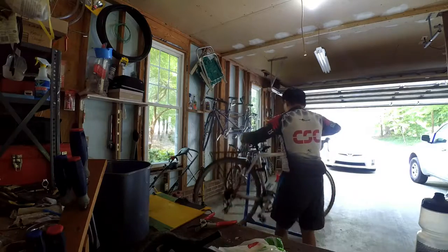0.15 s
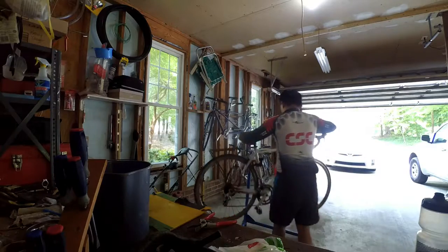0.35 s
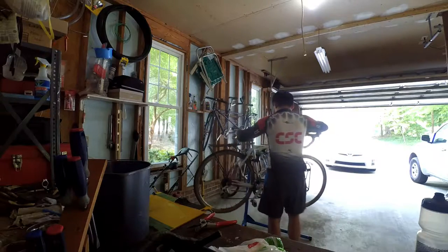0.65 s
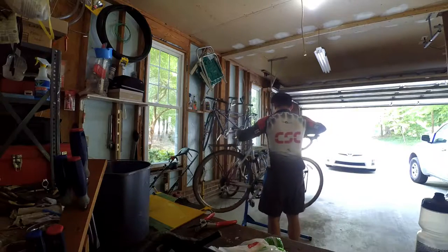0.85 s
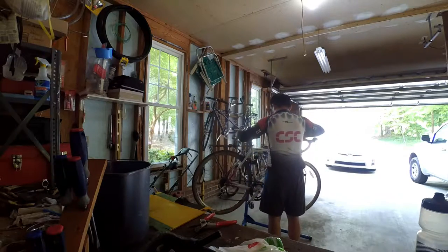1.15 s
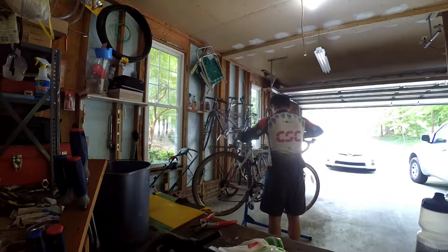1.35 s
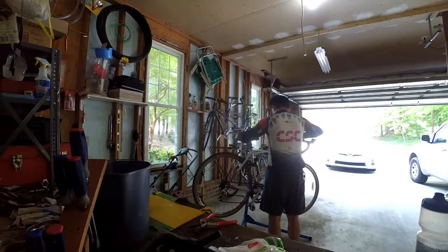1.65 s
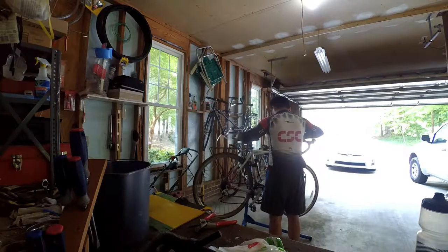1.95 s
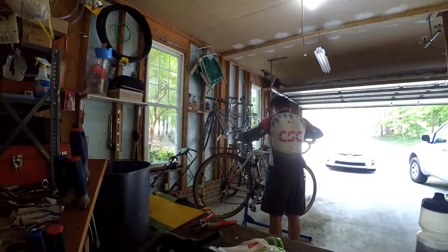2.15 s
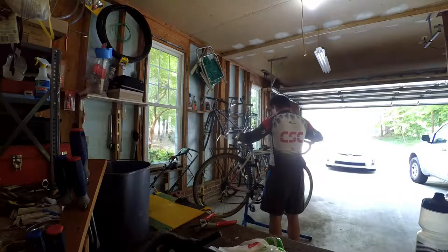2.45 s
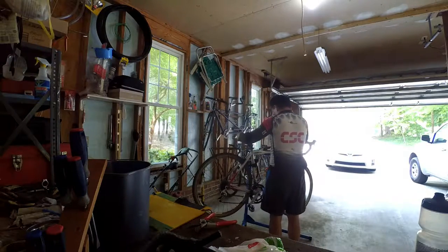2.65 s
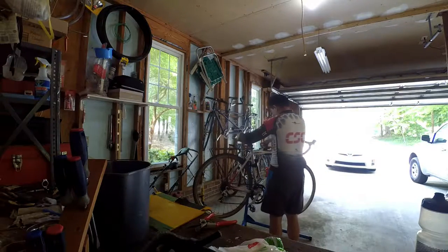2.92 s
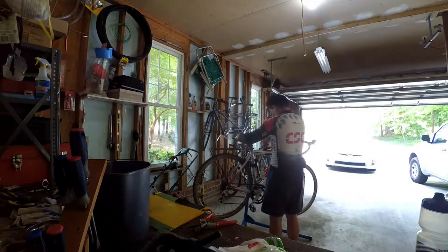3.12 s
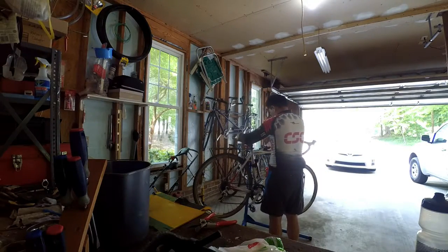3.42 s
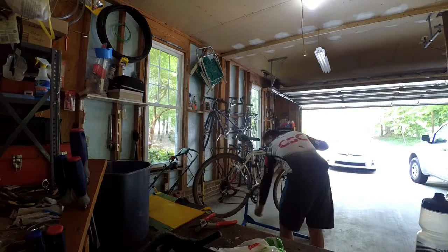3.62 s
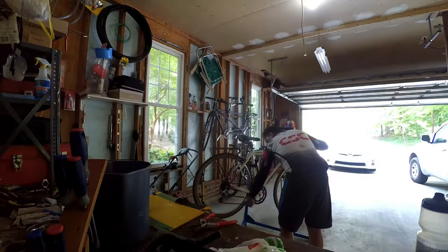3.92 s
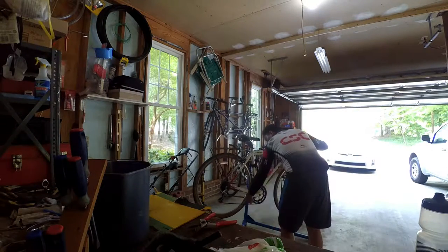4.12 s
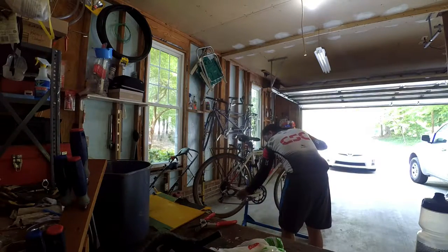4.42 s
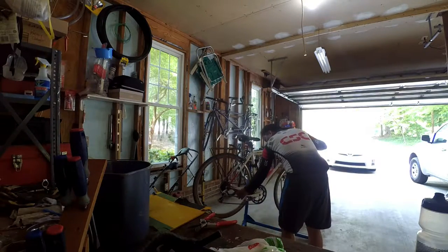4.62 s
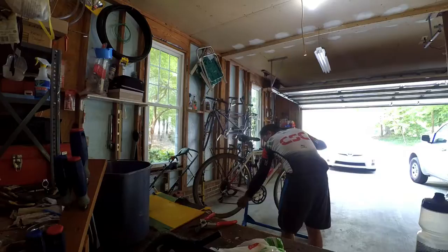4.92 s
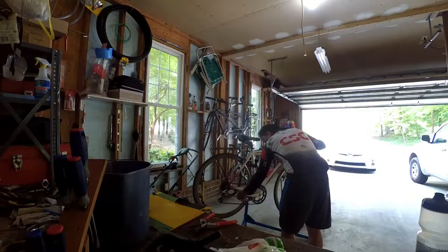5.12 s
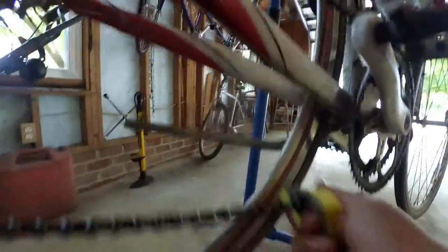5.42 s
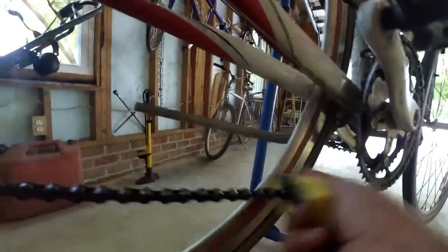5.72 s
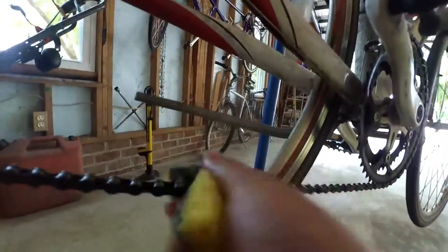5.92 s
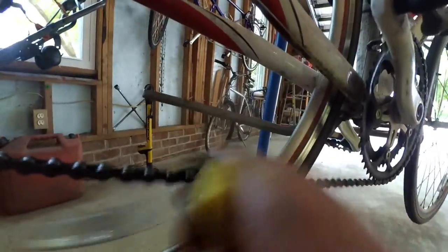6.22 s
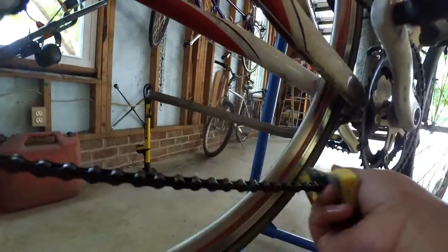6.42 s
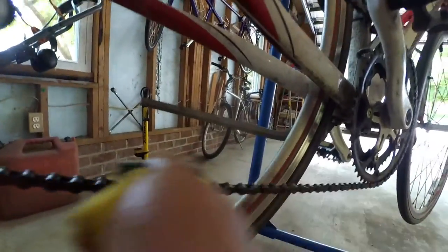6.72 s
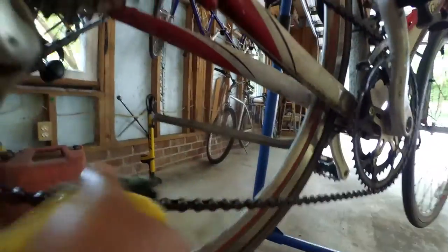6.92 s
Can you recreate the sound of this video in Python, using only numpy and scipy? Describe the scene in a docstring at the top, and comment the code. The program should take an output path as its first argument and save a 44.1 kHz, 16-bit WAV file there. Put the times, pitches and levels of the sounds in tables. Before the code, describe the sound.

An open garage with short reverberation, low wind rumble and faint hiss throughout. From 0 to 3.5 s, at a distance, shoes and clothes scuff softly while a bicycle is set in a repair stand: dull knocks, a loud bright metallic clank at about 0.85 s, lesser ringing clanks at 1.4, 2.1 and 3.0 s, a thud at 1.6 s. An insect buzzes faintly outside from 1 to 3 s; one tiny rising bird chirp comes at 3.4 s. After a cut at 3.5 s a faint low rush joins; from 3.85 s a few uneven clicks become a steady ratchet, about 26 ticks per second, slowing very slightly, over a faint chain whir. At 5.2 s the view jumps close: a low bump dies away, a sponge rubs the chain in gritty strokes with link flicks, and sharp, dry pawl snaps come about ten per second, turning weaker and irregular after 6.6 s until 7 s.

```python
"""In an open garage, over low wind rumble and faint hiss, shoes scuff and a bicycle is set into a repair stand.
The frame knocks and rings, an insect buzzes outside and a bird chirps once.
After a cut a low rush joins, the cranks are turned backwards and the freehub pawl ticks across the room.
At a second cut the lows jump and die away; a sponge rubs the chain and the pawl snaps close by.
Blows are short noise puffs through resonances and dying sines; friction, wind and insect are shaped noise."""
import sys
import numpy as np
from scipy import signal
from scipy.fft import rfft, irfft, next_fast_len
from scipy.io import wavfile
from scipy.ndimage import map_coordinates

SR = 44100
rng = np.random.default_rng(int(sys.argv[2]) if len(sys.argv) > 2 else 0)


def volts_from_db(level):
    """Convert decibel levels to linear amplitude ratios."""
    exponent = np.asarray(level, float) / 20
    return 10 ** exponent


def to_wav(s):
    """Save 16-bit WAV."""
    ch = np.atleast_2d(s).T  # columns
    pcm = np.round(np.clip(ch, -1, 1) * 32767)  # PCM
    wavfile.write(sys.argv[1], SR, pcm.astype(np.int16))


N = 311346  # samples

# where one shot replaces the other: cut_s
CUT_TIMES = [3.486, 5.205]

# wind rumble, relative spectrum: frequency_hz, density_db
RUMBLE_SPECTRUM = [(1, -2.5), (3, -2.5), (10, -4.5), (15, 1), (35, -6.5), (70, -20), (150, -24), (300, -38),
                   (600, -79.5)]
# faint hiss, relative spectrum: frequency_hz, density_db
HISS_SPECTRUM = [(120, -2), (250, -4.5), (500, -7), (1000, -13.5), (2000, -20.5), (4000, -20),
                 (8000, -26.5), (11000, -25), (15000, -30.5)]
# noise unlike at the two microphone ports, relative spectrum: frequency_hz, density_db
PORT_SPECTRUM = [(2, 9.5), (10, -0.5), (35, -12), (70, -5), (250, -24), (600, -38.5), (1200, -44.5),
                 (16000, -50)]
# decay of the garage: frequency_hz, t60_s
GARAGE_DECAY = [(500, 0.33), (4000, 0.48), (13000, 0.27)]

# strokes of shoes and clothes: loudest_s, rise_s, fall_s, level_db, treble_over_level_db
SCUFF_STROKES = [(0, .1, 0.11, -62, -2), (.33, 0.037, 0.16, -66.5, -8), (.48, 0.21, 0.084, -61.5, -6),
                 (.63, 0.007, 0.11, -56, 0.5), (.682, 0.048, 0.09, -55, -6), (2.22, 0.084, 0.11, -67.5, 2),
                 (3.49, .003, 0.47, -67.5, 0.5), (3.7, 0.39, 0.34, -73, 3.5)]
# dull part of the scuffs, relative spectrum: frequency_hz, density_db
SCUFF_DULL_SPECTRUM = [(300, -120), (800, -6.5), (1800, 0.5), (3500, 5), (6000, 0.5), (9000, -41)]
# bright part of the scuffs, relative spectrum: frequency_hz, density_db
SCUFF_BRIGHT_SPECTRUM = [(3500, -35), (5500, -6), (7500, -5.5), (11000, -15), (15000, -21), (16500, -33)]
STROKE_DB = 12  # a stroke swells and fades by this much in its rise and fall times

# dull knocks of tyre and frame: start_s, level_db, low_ring_hz, high_ring_hz, high_part_db
KNOCK_BLOWS = [(.106, -60.5, 530, 2000, -1), (.564, -59.5, 1175, 2500, -1), (1.562, -61.5, 1310, 2810, -7),
               (1.619, -52.5, 520, 3226, 2.5), (2.162, -70, 2000, 2300, -1), (2.222, -71, 936, 2090, 7.5),
               (2.558, -64.5, 1240, 2580, -0.5), (2.565, -66, 634, 1750, -9), (2.815, -66, 3026, 3400, 4),
               (2.849, -63, 1157, 3450, -13), (3.213, -69, 1326, 6440, -4), (3.437, -71, 2764, 2870, -4),
               (3.573, -65, 577, 1960, 0)]
# metal on metal at the stand: start_s, level_db, dull_part_db, clamp_ring_db, tube_ring_db
CLANK_BLOWS = [(.837, -46, -20, -27, -11), (.8465, -29.5, -27.5, -15.5, -40), (.8664, -45, -13.5, -5, -22),
               (1.4192, -41, -29, -25, -14.5), (1.4405, -56, -13, -35, -10), (2.082, -53.5, -54, -18, -15),
               (3.007, -52.5, -20, -25, -29)]
# ringing modes of the stand's clamp: pitch_hz, level_db, t60_s
CLAMP_MODES = [(1166, -14, .3), (2152, -14, .3), (2283, -16, .3), (4620, -13, .25), (4790, -11, .3),
               (4935, 0, .24), (5018, -3, .2), (5490, -13, .25), (6872, -2, .3), (7580, -6, .15),
               (7980, -7, .3), (8450, -10, .2), (8870, -17, .3), (11250, -19, .25), (12350, -17, .25)]
# ringing modes of the bicycle tubes: pitch_hz, level_db, t60_s
TUBE_MODES = [(2590, -8, .3), (3795, -9, .3), (4735, -7, .3), (5010, -5, .3), (5135, 0, .25),
              (5570, -4, .2), (5766, -5, .25), (6470, -7, .25), (7880, -6, .25), (8910, -12, .2)]
# first contact of the blows: centre_hz, width_hz, level_db
CRACK_PEAKS = [(2500, 1500, 4), (5000, 700, 9), (7700, 1200, 7), (12700, 4300, -10)]
RING_BLUR_HZ = 6  # random phase drift roughens every ring by about this width

# insect outside, swelling and fading: time_s, level_db
BUZZ_LEVEL = [(.9, -83), (1.1, -74.5), (1.6, -71), (2.2, -71.5), (2.75, -72.5), (2.95, -81), (3.0, -90)]
# insect, relative spectrum: frequency_hz, density_db
INSECT_SPECTRUM = [(3000, -30), (4300, -6), (5200, 0), (6300, -3), (8000, -30)]
# the bird's one chirp: time_s, pitch_hz, level_db
CHIRP_PATH = [(3.383, 5470, -70), (3.39, 6060, -58.5), (3.398, 7280, -55.5), (3.404, 7500, -66),
              (3.41, 7400, -80)]
# low rush after the first cut, relative spectrum: frequency_hz, density_db
MURMUR_SPECTRUM = [(120, -29), (250, -2), (400, -1), (700, -6), (1300, -31)]
MURMUR_DB = -75

# cranks being pushed into motion, pawl heard across the garage: start_s, level_db
STARTING_TICKS = [(3.8516, -48), (3.9494, -52), (4.0037, -48)]
# then the even ticks: the first one, the gap, and what each tick adds to the gap
STEADY_S, GAP_S, GAP_GROWS_S = 4.0475, .03842, .000042
# the even ticks, one by one: level_db
STEADY_TICK_LEVELS = [-52, -48, -50, -51, -46, -50, -50, -46, -45, -49, -44, -47, -46, -53, -49, -46, -48,
                      -45, -43.5, -43.5, -45.5, -46, -43, -43, -51, -43, -48, -49, -53, -49]
TICK_COLOUR_DB = 2.5  # random spread of resonance levels from tick to tick
# hub heard from afar: centre_hz, width_hz, level_db
FAR_HUB_PEAKS = [(4200, 1200, -13), (7000, 700, 0), (8100, 500, -3), (9300, 600, 2), (11200, 400, -7),
                 (13000, 800, -1)]
# thin rings of the spokes: centre_hz, width_hz, level_db
SPOKE_PEAKS = [(8870, 35, 0), (11200, 25, -1), (13550, 40, -1)]
# chain running, heard from afar: time_s, level_db
CHAIN_LEVEL = [(3.9, -81), (4.05, -69), (5.205, -67)]

# low jump at the second cut, relative spectrum: frequency_hz, density_db
LOW_JUMP_SPECTRUM = [(1, -10.5), (5, 2.5), (12, -8.5), (30, -19.5), (100, -65.5)]
LOW_JUMP_DB, LOW_JUMP_FADES_DB_PER_S, LOW_JUMP_RISE_S = -37, 20.5, .001

# strokes of the sponge on the chain: loudest_s, rise_s, fall_s, level_db, treble_over_level_db
SPONGE_STROKES = [(5.21, .003, 0.51, -62, 0), (5.48, 0.059, 0.089, -55.5, 1), (5.61, 0.065, 0.11, -59, -1),
                  (5.69, 0.1, 0.027, -63.5, 8.5), (5.78, 0.052, 0.3, -58.5, 0.5),
                  (5.94, 0.14, 0.097, -63, 0.5), (6.14, 0.072, 0.12, -58, -1.5),
                  (6.245, 0.022, 0.15, -57, -0.5), (6.5, 0.083, .3, -56, -1.5),
                  (6.77, 0.28, 0.077, -64.5, 2), (6.95, .1, 1, -60.5, -0.5)]
# dull part of the rubbing, relative spectrum: frequency_hz, density_db
RUB_DULL_SPECTRUM = [(250, -15.5), (700, -8.5), (1900, -4.5), (3200, -8.5), (5000, -12.5), (8000, -47)]
# bright part of the rubbing, relative spectrum: frequency_hz, density_db
RUB_BRIGHT_SPECTRUM = [(2500, -28), (4500, -7), (7800, -5.5), (10500, -14.5), (14000, -23), (16500, -27)]
# links flick free of the sponge at random; least level over the stroke, and the range above it
LINKS_PER_S, LINK_DB, LINK_SCATTER_DB = 16, 15, 7

# pawl heard close by: start_s, level_db, low_part_db, high_part_db, tooth_ring_hz
NEAR_SNAPS = [(5.265, -25.5, -24, -5.5, 8450), (5.3584, -26.5, -18.5, -7.5, 8700),
              (5.458, -30.5, -14.5, -2, 7750), (5.5648, -26.5, -18, -8, 8110),
              (5.649, -23.5, -23.5, -11.5, 7980), (5.734, -27.5, -24, -6.5, 7900),
              (5.858, -33.5, -17, -1.5, 7170), (5.9566, -27.5, -29, -2.5, 8000),
              (6.052, -30, -16.5, -5.5, 8700), (6.1574, -26.5, -23.5, -2, 8000),
              (6.2554, -29, -19.5, -0.5, 7120), (6.346, -26, -22.5, -2, 6800),
              (6.4534, -26, -22.5, -3.5, 8380), (6.604, -30.5, -25, -3.5, 9300),
              (6.6783, -42.5, -16.5, -29, 5430), (6.7314, -41, -21.5, -25, 6300),
              (6.7394, -45.5, -15, -17, 6800), (6.8565, -46, -17, -14, 7500),
              (6.8866, -30, -15.5, -3.5, 8700), (6.9803, -30, -21, 1, 5840)]
# rim and frame: centre_hz, width_hz, level_db
RIM_FRAME_PEAKS = [(2000, 1400, -7), (3150, 260, 0.5), (4280, 980, -3)]
# hub shell: centre_hz, width_hz, level_db
SHELL_PEAKS = [(6660, 5600, -9.5), (9180, 1700, -6.5)]
# pawl: centre_hz, width_hz, level_db
PAWL_PEAKS = [(10600, 3400, -3), (13720, 1750, -0.5)]
# low rings of the rim, heard close by: centre_hz, width_hz, level_db
RIM_PEAKS = [(3300, 60, 0), (4400, 90, -3)]

# steep cut of the very top, above about 15 kHz: frequency_hz, gain_db
TOP_CUT = [(14000, -1.5), (15100, -2.5), (15500, -20), (16500, -19)]
# constant offset of each channel, left then right: offset in full scale
CHANNEL_OFFSETS = [
    [.0031],
    [-.00536],
]


def unit(x):
    """x at rms 1."""
    return x / np.sqrt(np.mean(x ** 2) + 1e-20)


def along(points, hz):
    """Reads (Hz, value) points on a log frequency axis."""
    f, v = np.transpose(points)
    return np.interp(np.log(hz + 1), np.log(f + 1), v)


def curves(rows):
    """One value per sample for each column; -150, silent as a level, outside the table."""
    s, *cols = np.transpose(rows)
    return [np.interp(np.arange(N) / SR, s, c, left=-150, right=-150) for c in cols]


def wobble(rate):
    """A smooth random curve, rate knots a second."""
    knots = rng.standard_normal(int(N * rate / SR) + 4)
    return map_coordinates(knots, [np.arange(N) * rate / SR])


def filtered(x, response):
    """x times a complex response of frequency."""
    m = next_fast_len(N + SR // 2)
    return irfft(rfft(x, m) * response(np.fft.rfftfreq(m, 1 / SR)), m)[:N]


def noise(spectrum, grit_db=0):
    """Coloured noise of rms 1; grit makes it uneven from moment to moment."""
    gritty = rng.standard_normal(N) * volts_from_db(grit_db * wobble(300))
    return unit(filtered(gritty, lambda hz: volts_from_db(along(spectrum, hz))))


def body(x, peaks):
    """x through damped resonances side by side, neighbours in opposite sign."""
    def response(f):
        total = 0
        for k, (centre, width, db) in enumerate(peaks):
            damping = 1j * f * width
            total = total + (-1) ** k * volts_from_db(db) * damping / (centre * centre - f * f + damping)
        return total
    return filtered(x, response)


def bursts(times, db, t60, rise=.0003):
    """A short dying puff of noise at each time, its energy set by the blow."""
    out, t = np.zeros(N + SR), np.arange(SR // 8) / SR
    shape = volts_from_db(-60 * t / t60) * (1 - np.exp(-t / rise))
    for s, level in zip(times, db):
        puff = shape * rng.standard_normal(len(t))
        even = np.linalg.norm(shape) / np.linalg.norm(puff)
        out[round(s * SR):][:len(t)] += volts_from_db(level) * puff * even
    return out[:N]


def ring(modes, t):
    """Dying sines whose phase wanders at random, in slightly different shares at each blow."""
    total = 0
    for hz, db, t60 in modes:
        level = db + 1.5 * rng.standard_normal() - 60 * t / t60
        drift = np.cumsum(rng.standard_normal(len(t))) * np.sqrt(2 * np.pi * RING_BLUR_HZ / SR)
        total = total + volts_from_db(level) * np.sin(2 * np.pi * hz * t + drift)
    return total


def strokes(rows):
    """Gains of the dull and the bright part of swelling and fading friction strokes; their powers add."""
    peak_s, rise_s, fall_s, db, treble_db = np.transpose(rows)[:, :, None]
    t = np.arange(0, N + 64, 64) / SR
    level = db - STROKE_DB * np.maximum((peak_s - t) / rise_s, (t - peak_s) / fall_s)
    gains = [np.linalg.norm(volts_from_db(part), axis=0) for part in (level, level + treble_db)]
    return [np.interp(np.arange(N) / SR, t, gain) for gain in gains]


def garage(x, wet_db):
    """Adds the room's answer, a new tail every quarter second; each frequency dies at its own speed."""
    out, step = np.zeros(N + SR), SR // 4
    for a in range(0, N, step):
        hz, t, z = signal.stft(rng.standard_normal(SR // 2), SR, nperseg=256)
        decay = volts_from_db(-60 * t / along(GARAGE_DECAY, hz)[:, None])
        tail = signal.istft(z * decay, SR, nperseg=256)[1]
        late = np.pad(tail / np.linalg.norm(tail), (260, 0))  # room starts 260 samples after the blow
        wet = signal.fftconvolve(x[a:a + step], late)
        out[a:a + len(wet)] += wet
    return x + volts_from_db(wet_db) * out[:N]


def wind_rumble():
    """Deep wind noise that swells a little at random."""
    return volts_from_db(-46 + 1.2 * wobble(2.98)) * noise(RUMBLE_SPECTRUM)


def hiss():
    """Faint, steady coloured noise."""
    return volts_from_db(-67.5) * noise(HISS_SPECTRUM)


def port_noise():
    """Steady noise that reaches the two microphone ports with opposite sign."""
    return volts_from_db(-72.5) * noise(PORT_SPECTRUM)


def scuffs():
    """Gritty friction of shoes and clothes, with a duller and a brighter part."""
    dull, bright = strokes(SCUFF_STROKES)
    return dull * noise(SCUFF_DULL_SPECTRUM, grit_db=1.0) + bright * noise(SCUFF_BRIGHT_SPECTRUM, grit_db=2)


def knocks():
    """Two damped rings at each knock's own pitches over a soft thud; soft contact leaves little treble."""
    rings, t = np.zeros(N + SR), np.arange(SR // 8) / SR
    for s, db, low_hz, high_hz, high_db in KNOCK_BLOWS:
        pair = ring([(low_hz, 0, .045), (high_hz, high_db, .028)], t)
        rings[round(s * SR):][:len(t)] += volts_from_db(db + 5) * pair * (1 - np.exp(-t / .002))
    s, db, _, _, high_db = np.transpose(KNOCK_BLOWS)
    thud = body(bursts(s, db + 11.5, t60=0.1, rise=0.0026), [(567, 89, 1), (1250, 670, 1)])
    scrape = bursts(s, db + high_db + 11.5, t60=0.063, rise=.003)
    scrape = body(body(scrape, [(3080, 2400, 0)]), [(3300, 2400, 0)])
    return garage(rings[:N] + thud + scrape, wet_db=1.5)


def clanks():
    """Each blow rings clamp and tubes in its own shares, with a crack and a dull part."""
    rings, t = np.zeros(N + SR), np.arange(SR // 2) / SR
    for s, db, _, clamp_db, tubes_db in CLANK_BLOWS:
        modes = volts_from_db(clamp_db) * ring(CLAMP_MODES, t) + volts_from_db(tubes_db) * ring(TUBE_MODES, t)
        rings[round(s * SR):][:len(t)] += volts_from_db(db) * modes * (1 - np.exp(-t / .003))
    s, db, dull_db = np.transpose(CLANK_BLOWS)[:3]
    crack = body(bursts(s, db - 6, t60=.04, rise=.001), CRACK_PEAKS)
    thud = bursts(s, db + dull_db + 22.0, t60=0.021, rise=0.00039)
    thud = body(thud, [(520, 210, 0.5), (1280, 150, 6.0)])
    return garage(rings[:N], wet_db=-1.5) + garage(crack + thud, wet_db=5)


def insect():
    """The buzz outside: a band of noise that swells and fades."""
    return volts_from_db(curves(BUZZ_LEVEL)[0]) * noise(INSECT_SPECTRUM)


def bird():
    """One rising whistle, a gliding sine heard mostly as echo."""
    hz, db = curves(CHIRP_PATH)
    return garage(volts_from_db(db) * np.sin(2 * np.pi * np.cumsum(hz) / SR), wet_db=1.5)


def murmur():
    """A low rush of noise whose level wavers at random."""
    return volts_from_db(MURMUR_DB + 3.6 * wobble(6)) * noise(MURMUR_SPECTRUM)


def far_hub():
    """Each tick comes straight, then weaker off floor and walls, then as room; the colour varies by tick."""
    k = np.arange(len(STEADY_TICK_LEVELS))
    first_s, first_db = np.transpose(STARTING_TICKS)
    s = np.r_[first_s, STEADY_S + GAP_S * k + GAP_GROWS_S * k ** 2 / 2]
    db = np.r_[first_db, STEADY_TICK_LEVELS]

    def share():
        return db + TICK_COLOUR_DB * np.clip(rng.standard_normal(len(s)), -2, 1)

    def tick():
        straight = bursts(s, share(), t60=.007)
        floor = bursts(s + .0065, share() - 5, t60=.01)
        return straight + floor

    walls = bursts(s + 0.0074, db - 10, t60=0.061, rise=0.0012)
    whir = noise([(600, -29), (2000, -2.5), (4500, -1.5), (9000, -3.5), (15000, -7)])
    whir = volts_from_db(curves(CHAIN_LEVEL)[0]) * whir  # the running chain
    hub = sum(body(tick(), [peak]) for peak in FAR_HUB_PEAKS)  # fresh shares for every resonance
    hub = hub + body(walls, FAR_HUB_PEAKS)
    spokes = volts_from_db(4) * body(tick() + walls, SPOKE_PEAKS)
    return volts_from_db(7.5) * garage(hub + spokes, wet_db=-8.5) + whir


def low_jump():
    """A low jump at the second cut, deep sway of noise dying away after it."""
    t = np.abs(np.arange(N) / SR - CUT_TIMES[1])
    gain = volts_from_db(LOW_JUMP_DB - LOW_JUMP_FADES_DB_PER_S * t) * (1 - np.exp(-t / LOW_JUMP_RISE_S))
    return gain * noise(LOW_JUMP_SPECTRUM)


def sponge():
    """The sponge drags over the links in strokes of gritty noise; now and then a link flicks."""
    dull, bright = strokes(SPONGE_STROKES)
    gap, size = rng.random(size=(40, 2)).T
    s = CUT_TIMES[1] + np.cumsum(2 * gap) / LINKS_PER_S
    now = s < N / SR
    flicks = bursts(s[now], LINK_DB + LINK_SCATTER_DB * size[now], t60=0.0076)
    links = dull * body(flicks, [(5000, 3300, 1)])
    rub = dull * noise(RUB_DULL_SPECTRUM, grit_db=1.5) + bright * noise(RUB_BRIGHT_SPECTRUM, grit_db=1.5)
    return rub + links


def near_hub():
    """The pawl snaps over a tooth, each with its own short ring; hub, rim and spokes rattle on briefly."""
    s, db, low_db, high_db, _ = np.transpose(NEAR_SNAPS)

    def snap(level, t60=.004):
        return bursts(s, level + 2, t60) + bursts(s, level - 21, t60=.055)  # contact, then rattle

    bright = body(snap(db + 15.5), SHELL_PEAKS) + body(snap(db + high_db + 14.5), PAWL_PEAKS)
    bright = body(bright, [(9000, 17400, 0.96)])
    low = body(snap(db + low_db + 22.5, t60=0.0073), RIM_FRAME_PEAKS)
    tooth, t = np.zeros(N + SR), np.arange(SR // 20) / SR
    for start, level, _, _, hz in NEAR_SNAPS:
        tone = ring([(hz, 0, .006)], t) * (1 - np.exp(-t / .0003))
        tooth[round(start * SR):][:len(t)] += volts_from_db(level + 3) * tone
    spokes = 0
    for peak in SPOKE_PEAKS + [(7500, 90, 0)]:
        share_db = TICK_COLOUR_DB * rng.standard_normal(len(s))
        spokes = spokes + body(snap(db + 10 + share_db), [peak])
    rim = body(snap(db + low_db + 31.5), RIM_PEAKS)
    return garage(bright + low + spokes + rim, wet_db=-15.5) + tooth[:N]  # tooth rings stay dry


def scene():
    """Three shots, one after the other, over the same air; returns left and right."""
    t = np.arange(N) / SR
    first, after_first, last = t < CUT_TIMES[0], t > CUT_TIMES[0], t > CUT_TIMES[1]
    setting_up = clanks() + knocks() + bird() * first
    across_room = far_hub() * ~last
    close_by = near_hub()
    friction = scuffs() + sponge() * last
    jump = low_jump() * last
    air = wind_rumble() + hiss() + insect() + murmur() * after_first
    mid = setting_up + across_room + close_by + friction + jump + air
    side = port_noise()
    return np.array([mid + side, mid - side])


def roll_off(x):
    """The treble ends steeply here."""
    return signal.sosfilt(signal.butter(12, 16510, fs=SR, output="sos"), x)


def record(dry):
    """The very top is cut steeply above about 15 kHz, and each channel has its own small constant offset."""
    def response(hz):
        return volts_from_db(along(TOP_CUT, hz))
    heard = np.array([filtered(channel, response) for channel in dry])
    return roll_off(heard + CHANNEL_OFFSETS)


dry = scene()
out = record(dry)
to_wav(out)
```